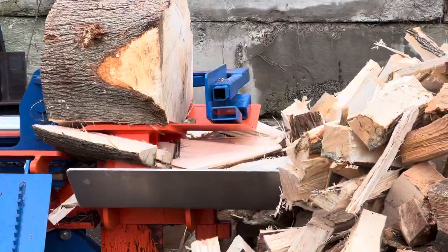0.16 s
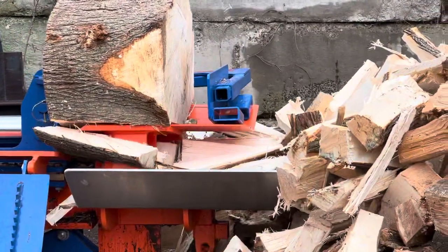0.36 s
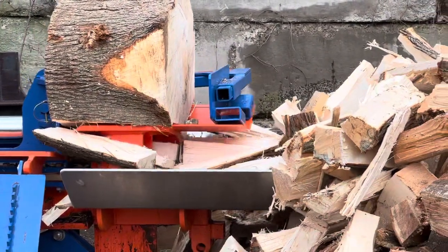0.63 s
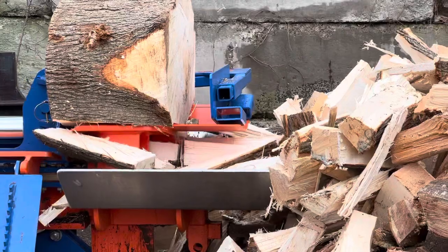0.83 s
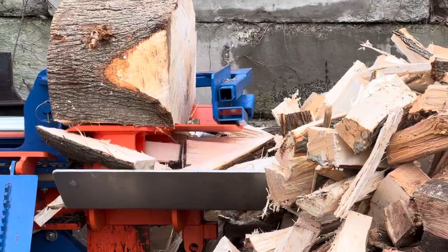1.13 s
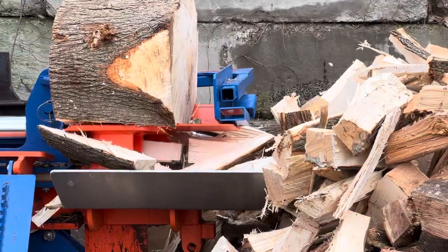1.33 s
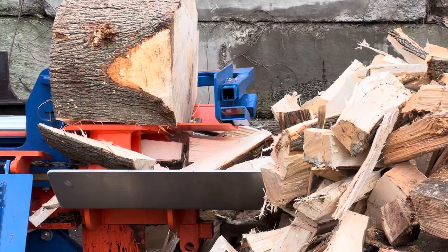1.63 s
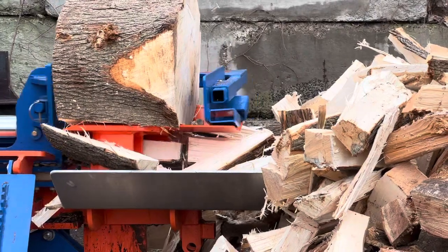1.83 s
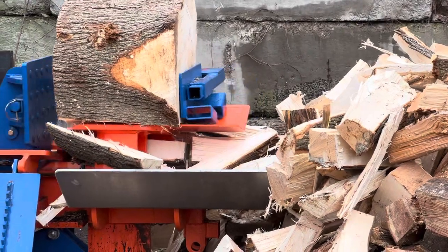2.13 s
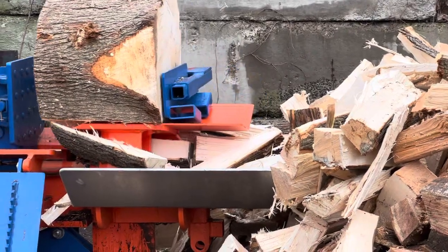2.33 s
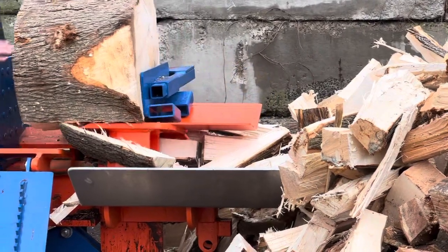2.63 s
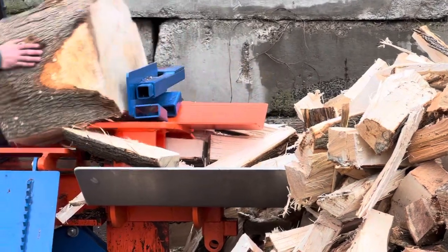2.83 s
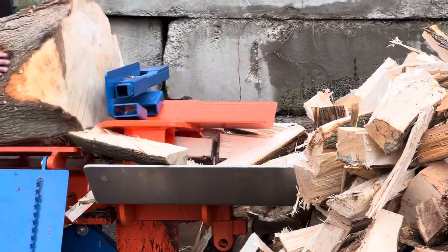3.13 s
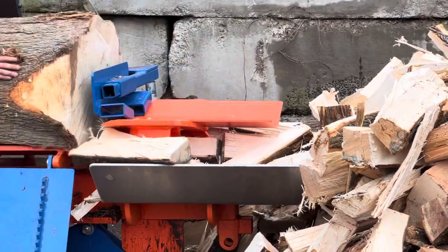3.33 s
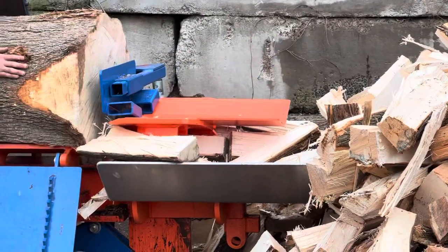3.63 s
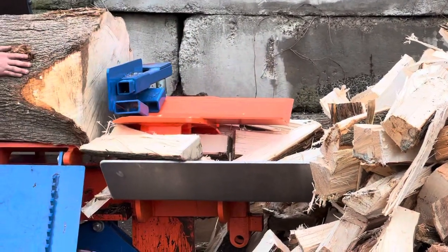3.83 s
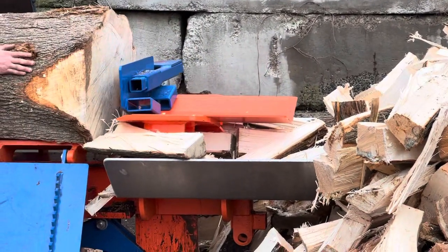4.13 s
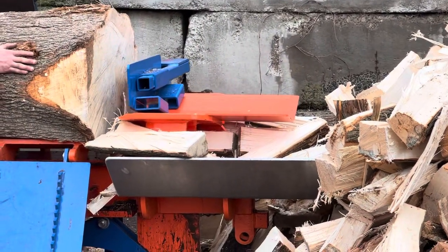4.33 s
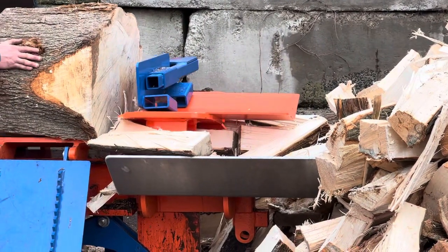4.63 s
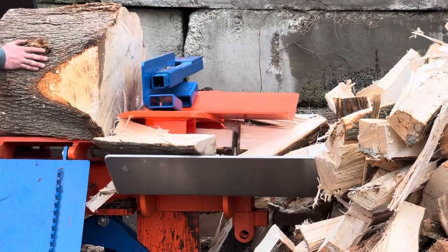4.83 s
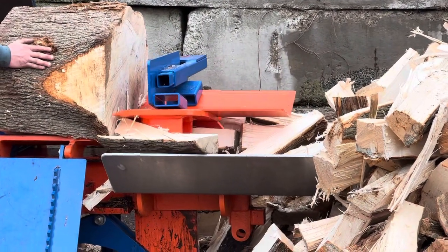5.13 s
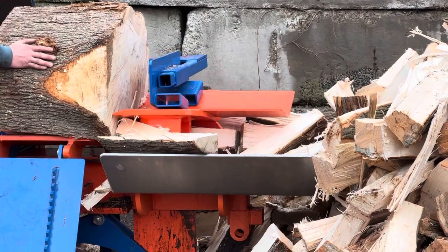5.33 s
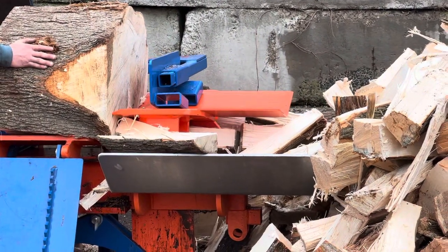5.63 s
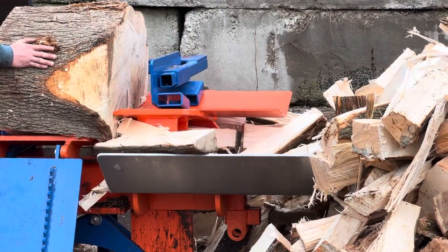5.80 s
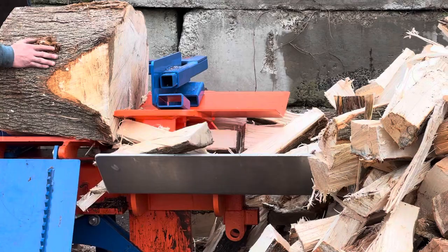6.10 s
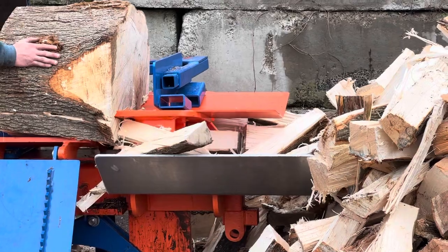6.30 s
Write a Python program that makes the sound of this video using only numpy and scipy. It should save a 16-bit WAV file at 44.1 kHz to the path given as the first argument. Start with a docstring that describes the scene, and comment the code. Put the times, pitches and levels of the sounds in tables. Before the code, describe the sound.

Outdoors beside a wall, a log splitter's engine runs with a steady exhaust drone and valve rattle, its tone shifting with the load. Wood creaks and snaps under pressure, followed by two rattling metal clunks and a few small cracks. Near the end the log groans against the steel, the frame knocks again and the fibres split in a burst of sharp crackles. The machine sits in the middle of a slightly wide stereo image.

```python
"""A yard beside a block wall, where a small four-stroke engine drives a hydraulic log splitter. The engine is
the bed: exhaust drone, clatter and valve rattle change colour with the pump load. Over it, wood grinds and
creaks along the steel, short tonal groans swell up, the ram knocks at the ends of its stroke and the log cracks
on the wedge. A drifting haze of sparse echoes and a pair of microphone ports give the width."""
import sys
import numpy as np
from scipy import signal
from scipy.fft import rfft, irfft, next_fast_len
from scipy.io import wavfile
from scipy.ndimage import uniform_filter1d

SR = 44100
rng = np.random.default_rng(int(sys.argv[2]) if len(sys.argv) > 2 else 0)


def master(y):
    """Save y as 16-bit WAV."""
    cut = np.clip(np.atleast_2d(y).T, -1, 1)
    pcm = np.round(cut * 32767)  # scale
    wavfile.write(sys.argv[1], SR, pcm.astype(np.int16))


N = 284886

# engine moves: (time [s], firing rate [Hz], pump load [-1 lugging, 0 idle, 1 ram returning, 2 pushing])
ENGINE = [(0, 27.61, 1.98), (1.1, 27.44, 1.76), (1.4, 27.62, 1.65), (1.51, 27.63, 1.04),
          (1.68, 28.42, 0.62), (1.76, 27.62, 1.2), (1.98, 27.24, 1.01), (3.38, 27.81, 0.94),
          (3.49, 28.11, 0.84), (3.58, 29, 0.78), (3.69, 29.4, -0.19), (3.78, 28.38, 0.024),
          (5.05, 28.44, 0.0017), (5.14, 27.96, -.2), (5.25, 27.21, -.8), (5.33, 27.22, -1.2),
          (5.47, 28.43, -0.49), (5.63, 27.84, -0.33), (5.72, 27.6, -1), (5.86, 27.65, -0.91),
          (5.97, 28.64, -0.7), (6.17, 28.3, -0.25), (6.46, 28.86, -0.48)]
# engine faders: (pump load, exhaust [dB], clatter [dB], valve gear [dB])
EFFORT = [(-0.95, -22, -28, -38), (-0.021, -26, -31.5, -38), (0.94, -23, -28.5, -37.5),
          (1.87, -23, -26.6, -35.5)]
# tone of exhaust and frame at each of the four loads: (firing order, level [dB])
LUGGING = [(1, -34), (2, -13), (3, -6.5), (4, -15), (5, 1.5), (6, -7.5), (7, -7.5), (8, -5), (9, -19),
           (10, -26), (11, -20), (12, -26), (13, -16), (14, -20), (15, -17), (16, -10), (17, -32),
           (18, -14), (19, -25), (20, -35), (21, -19), (22, -37), (23, -25), (24, -23), (25, -43),
           (26, -34), (27, -41), (28, -31), (29, -19), (30, -35), (31, -34), (32, -45), (33, -48),
           (34, -42), (35, -31), (36, -18)]
IDLING = [(1, -35), (2, -14), (3, -3), (4, -27), (5, 0.5), (6, -16), (7, -30.5), (8, -21), (9, -27),
          (10, -9.5), (11, -9.5), (12, -27), (13, -8), (14, -16), (15, -25), (16, -22.5), (17, -29.5),
          (18, -17.5), (19, -27), (20, -61), (21, -15), (22, -32.5), (23, -31), (24, -27), (25, -51),
          (26, -25.5), (27, -27), (28, -21.5), (29, -16.5), (30, -68), (31, -24.5), (32, -39), (33, -28),
          (34, -21), (35, -25), (36, -23)]
RETURNING = [(1, -53), (2, -17.5), (3, -6.5), (4, -14.5), (5, 0.5), (6, -5), (7, -6.5), (8, -5.5),
             (9, -21.5), (10, -12.5), (11, -14.5), (12, -57), (13, -22), (14, -10.5), (15, -18.5),
             (16, -10.5), (17, -47), (18, -24), (19, -26.5), (20, -38), (21, -23.5), (22, -23.5),
             (23, -14.5), (24, -26), (25, -20.5), (26, -48), (27, -70), (28, -19), (29, -24), (30, -29),
             (31, -72), (32, -21.5), (33, -53), (34, -31), (35, -22), (36, -18)]
PUSHING = [(1, -51), (2, -19), (3, -6.5), (4, -20), (5, 1), (6, -2), (7, -9), (8, -5.5), (9, -12), (10, -7),
           (11, -10.5), (12, -22), (13, -18), (14, -11.5), (15, -12.5), (16, -10.5), (17, -65), (18, -40),
           (19, -13.5), (20, -11.5), (21, -28), (22, -11), (23, -7.5), (24, -19), (25, -18), (26, -34),
           (27, -63), (28, -11.5), (29, -20), (30, -19), (31, -12), (32, -17), (33, -23), (34, -24),
           (35, -14), (36, -18)]
# colour of mechanical clatter and cooling air: (frequency [Hz], gain [dB])
CLATTER_EQ = [(30, -26), (100, -1), (300, 1), (700, -6.5), (1200, -10), (1900, -14.5), (3000, -17),
              (5000, -21), (8400, -20.5), (9600, -22), (10500, -20.5), (11500, -21.5), (12600, -25.5),
              (15500, -30)]
# casing resonances: (frequency [Hz], width [Hz], idle boost [dB], loaded boost [dB])
CASING = [(1320, 44, 5, 11), (1440, 30, 11, -1), (1620, 40, -1, 9.5), (1668, 50, 11, -4),
          (1795, 30, 11.5, -6), (2250, 55, 12, 7.5), (2433, 80, 8, 7), (2725, 130, -1, 7.5),
          (3040, 45, -7, 11), (3440, 37, 11, 9), (3980, 60, 0, 9.5), (4729, 40.3, 11, 3),
          (5040, 150, 10, 10.5), (5437, 40.1, 10, 6)]
# colour of wood dragged on steel: (frequency [Hz], gain [dB])
WOOD_EQ = [(88, -9), (150, -7.5), (345, 0.5), (638, -7.5), (729, -6), (792, -6.5), (1620, -16), (2040, -30),
           (3000, -21.5), (8000, -68), (10400, -64), (17600, -120)]
# fader ride of the grinding: (time [s], level [dB])
GRIND_FADER = [(0, -28.5), (.2, -25.5), (.5, -26.5), (.6, -23.5), (.8, -28), (.97, -30), (1.1, -28),
               (1.25, -26), (1.4, -30), (1.68, -32), (1.9, -33), (3.6, -29), (4.1, -37), (5.05, -32.5),
               (5.35, -32.5), (5.8, -28), (6.46, -29)]
# short groaning tones: (time [s], length [s], pitch [Hz], peak [dB])
GROANS = [(2.89, 0.053, 928, -22), (5.111, 0.086, 281.3, -24.5), (5.231, 0.13, 376, -23.5),
          (5.302, 0.066, 439.5, -32), (5.742, 0.078, 255, -21), (5.839, 0.077, 285, -24.5)]
# single slips of the wood: (time [s], level [dB])
CREAKS = [(0.0682, -10.5), (0.1171, -17), (0.1334, -9), (0.162, -11), (0.2333, -14), (0.2708, -12),
          (0.2958, -14), (0.3215, -13), (0.444, -15.5), (0.496, -13), (0.533, -17), (0.5618, -13.5),
          (0.5896, -15), (0.628, -13), (0.6625, -18), (0.709, -17.5), (0.752, -18), (0.7923, -20),
          (0.832, -17.5), (0.8993, -17.5)]
# creak pitch, climbing as the split tightens: (time [s], pitch [Hz])
CREAK_PITCH = [(0, 1060), (.33, 1070), (.37, 1300), (.68, 1313), (.71, 1620), (1.5, 1580)]
# blows on the frame: (time [s], level [dB], rattle [dB], rattle top end [dB], thump [dB], t60 [s])
KNOCKS = [(1.724, -7.5, -13, 0, -20, 0.097), (1.733, -7, -8.5, -3, -21, 0.11),
          (1.744, -4, -17, -8, -13, 0.14), (1.756, -8, -23, -7, -13, 0.13),
          (1.789, -13.5, -22, -7, -19, 0.22), (2.928, -19, -32, -9, -29, 0.12),
          (3.341, -6.5, -15.5, -11, -28, 0.15), (3.349, -5.5, -15, -12, -25, 0.092),
          (3.364, -10, -26, -14, -23, 0.15), (3.39, -14, -16, -14, -28, 0.12),
          (5.139, -22, -28, -9, -32, 0.075), (5.722, -15, -9.5, -6, -32, 0.12),
          (5.749, -12, -14.5, -4, -26, 0.12)]
# ring of the frame: (frequency [Hz], relative level [dB], t60 [s])
FRAME_MODES = [(172, -22, 0.14), (243, -19, 0.14), (302, 27.5, 0.094), (360, 11, 0.3), (457, -20, .08),
               (630, -5.5, 0.073), (944, -9, 0.072), (1170, 4, 0.074), (1480, 7.5, 0.055)]
# fibres snapping: (time [s], peak [dB], low ring [Hz], high ring [Hz], high over low [dB],
# splinter hiss [dB], t60 [s])
CRACKS = [(0.1327, -17, 1650, 2920, 3, 1.5, .03), (0.7066, -13.5, 1620, 2960, -12, 1, .04),
          (1.0932, -9, 2280, 3170, 9, -1, 0.033), (1.1044, -13.5, 2300, 3550, 8, -4, 0.048),
          (3.6969, -17, 1842, 3480, -10, 8, .08), (3.7194, -22, 2250, 3410, -5, -1.5, 0.069),
          (4.6235, -19, 1654, 3774, -3, 3, 0.03), (4.657, -16.5, 1879, 4494, 5, 9, 0.024),
          (4.671, -16, 2000, 3299, 11, 1.5, .025), (5.7217, -9, 1800, 3730, 2, 4, 0.056),
          (5.7994, -18, 1540, 3700, 10, -2, 0.096), (5.8301, -11.5, 1490, 3020, 2, 2, 0.047),
          (5.8414, -11, 1400, 3443, -8, -1.5, 0.056), (6.0345, -12, 1450, 2806, -6, -2, 0.021),
          (6.0764, -3.5, 1970, 4450, -5, 14, 0.019), (6.1901, -2.5, 1806, 4058, 2, 6, 0.011),
          (6.2261, -6, 1917, 6060, -6, 1.5, .013), (6.2464, -17, 1202, 3096, -4, -2, 0.046),
          (6.4263, -21, 1630, 3370, -1, -3, .055)]
# send to the widening echoes: (frequency [Hz], gain [dB])
WIDTH_EQ = [(40, -27), (130, -19), (300, -19), (600, -12), (1200, -12), (1600, -30), (2600, -36),
            (3400, -17), (5000, -20), (7200, -34), (8400, -10), (9100, -10), (9400, -50), (10800, -50),
            (11100, -9), (12200, -9), (12700, -45), (14300, -45), (15000, -5)]
# tilt between the ports: (frequency [Hz], left over right [dB])
PORT_BALANCE = [(60, 0.5), (92, 1.0), (140, 3.5), (210, 1.5), (330, 1.0), (500, 1.5), (770, 3.0),
                (1170, 2.5), (1790, 0.5), (2740, 0.0), (4190, 0.0), (6410, 0.0), (9810, 0.0), (15000, 0.0)]
# phase between the ports: (frequency [Hz], left lead [half turns])
PORT_LEAD = [(60, 0), (700, .12), (1500, 0), (7500, 0), (8700, -.45), (9250, -1), (10850, -1),
             (11500, -1.45), (12550, -2), (14400, -2), (15500, -3)]

OVERSPEED_HZ, THROTTLE_DB_PER_HZ = 28.2, -3
IDLE_HZ, LOADED_HZ = 28.4, 27.5
TEAR_START_S, TEAR_END_S, SMALL_SNAPS = 5.74, 6.28, 12
THUMP_HZ, HIGH_CUT_HZ = 81, 15600


def amp(db):
    """dB to gain."""
    return 10 ** (np.asarray(db) / 20)


def unit_rms(x):
    """Scales to rms 1."""
    return x / np.sqrt(np.mean(x ** 2) + 1e-20)


def automation(rows):
    """Columns of a time table, one value a sample."""
    times, *columns = np.transpose(rows)
    return [np.interp(np.arange(N) / SR, times, column) for column in columns]


def read_curve(points, hz):
    """Reads a spectrum table on a log-frequency axis."""
    knots, values = np.transpose(points)
    return np.interp(np.log(hz + 1), np.log(knots + 1), values)


def eq(x, points):
    """Filters by a table of (frequency [Hz], gain [dB])."""
    size = next_fast_len(len(x) + 2048)
    gain = amp(read_curve(points, np.fft.rfftfreq(size, 1 / SR)))
    return irfft(rfft(x, size) * gain, size)[:len(x)]


def wander(seconds, count=1):
    """Rows of smooth random modulation, rms 1, that change over the given time."""
    steps = rng.standard_normal((count, N // 128 + 2))
    span = max(round(seconds * SR / 128), 1)
    steps = unit_rms(uniform_filter1d(uniform_filter1d(steps, span, axis=1), span, axis=1))
    return np.array([np.interp(np.arange(N) / 128, np.arange(len(row)), row) for row in steps])


def clicks(per_second, spread_db, cap):
    """Random clicks at rms 1, the biggest up to cap * spread_db above the smallest."""
    sizes = amp(spread_db * np.minimum(rng.exponential(1, N), cap))
    hits = rng.random(N) < per_second / SR
    return unit_rms(sizes * hits * rng.choice([-1, 1], N))


def ring(hz, t60, t):
    """A dying mode."""
    return amp(-60 * t / t60) * np.sin(2 * np.pi * hz * t)


def add(mix, start, sound):
    """Mixes a sound in at start seconds."""
    part = mix[round(start * SR):][:len(sound)]
    part += sound[:len(part)]


def stereo_width(direct):
    """Sparse, quickly dying echoes spread the sound between the channels; the spread drifts between four sets
    of them."""
    taps = np.zeros((4, 2000))
    delays = np.arange(40, 1980, 20) + rng.integers(0, 20, (4, 97))
    gains = rng.choice([-1., 1.], delays.shape) * amp(-60 * delays / SR / 0.01)
    np.put_along_axis(taps, delays, gains, axis=1)
    blend = wander(0.028, count=4)
    send = eq(direct, WIDTH_EQ)
    paths = signal.oaconvolve(send[None], taps / np.linalg.norm(taps[0]), axes=1)[:, :N]
    return (paths * blend).sum(axis=0) / np.linalg.norm(blend, axis=0)


def clatter(cycles):
    """Cooling air and valve ticks swell after each firing and, less, half a cycle later."""
    pulse = 1 + 0.29 * np.exp(-(cycles % 1) / 0.24) + 0.18 * np.exp(-((cycles + .5) % 1) / 0.22)
    ticks = clicks(per_second=1500, spread_db=2.5, cap=5)
    air = rng.standard_normal(N)
    flutter = amp(1.03 * wander(.02)[0])
    return unit_rms(eq(pulse * (air + 0.49 * ticks) * flutter, CLATTER_EQ))


def valve_gear(cycles, load):
    """Valves and pump gears loop one rattle a cycle; load crossfades the idle and loaded loops."""
    order = np.arange(1025)
    phase, uneven = rng.random((2, len(order))), rng.standard_normal((2, len(order)))
    hz = np.outer([IDLE_HZ, LOADED_HZ], order)
    casing_db = sum(np.array(boosts)[:, None] / (1 + (2 * (hz - centre) / width) ** 4)
                    for centre, width, *boosts in CASING)
    muted = (order <= len(IDLING)) | (order > 300)  # the low orders are left to the exhaust
    order_db = read_curve(CLATTER_EQ, hz) + casing_db + 2.4 * uneven - 60 * muted
    loops = irfft(np.exp(2j * np.pi * phase) * amp(order_db), axis=1)
    playhead = (cycles + 0.00037 * wander(0.079)[0]) % 1
    grid = np.arange(loops.shape[1]) / loops.shape[1]
    idle, loaded = [np.interp(playhead, grid, unit_rms(loop)) for loop in loops]
    crossfade = np.clip(abs(load), 0, 1) * np.pi / 2
    return np.cos(crossfade) * idle + np.sin(crossfade) * loaded


def exhaust(cycles, load):
    """A drone of firing orders; the load morphs their levels and each wavers, the high ones most."""
    out, waver = np.zeros(N), wander(0.053, count=len(IDLING))
    for k, rows in enumerate(zip(LUGGING, IDLING, RETURNING, PUSHING)):
        order, levels = rows[0][0], [row[1] for row in rows]
        db = np.interp(load, range(-1, 3), levels) + 0.079 * order * waver[k]
        # pipe and silencer delay each order differently, smearing the pulse over the whole cycle
        phase = -.75 * order ** 2 - .6 * (order % 2) - 1.1
        out += amp(db) * np.cos(2 * np.pi * order * cycles + phase + 0.032 * order * waver[k - 1])
    return np.sqrt(2) * out


def engine(firing_hz, cycles, load):
    """The load rides three layers; the governor throttles the exhaust back when the engine races."""
    loads, *faders = np.transpose(EFFORT)
    exhaust_db, clatter_db, gear_db = [np.interp(load, loads, fader) for fader in faders]
    throttle_db = THROTTLE_DB_PER_HZ * np.maximum(firing_hz - OVERSPEED_HZ, 0)
    return (amp(exhaust_db + throttle_db) * exhaust(cycles, load)
            + amp(gear_db) * valve_gear(cycles, load)
            + amp(clatter_db) * clatter(cycles))


def grind(cycles, load):
    """Stick-slip grains, shaken loose by each firing; they sing at the creak pitch as the ram pushes."""
    density = amp(1.5 * wander(.01)[0]) * (1 + .5 * np.cos(2 * np.pi * cycles))
    rub = clicks(per_second=2500 * density, spread_db=2, cap=3) + 0.76 * rng.standard_normal(N)
    carrier = np.exp(2j * np.pi * np.cumsum(automation(CREAK_PITCH)[0]) / SR)
    pole = np.exp(-np.pi * 90 / SR)  # a gliding resonance 90 Hz wide
    resonance = (carrier * signal.lfilter([1 - pole], [1, -pole], rub / carrier)).real
    sing = unit_rms(resonance * np.clip(load - 1, 0, 1))
    return amp(automation(GRIND_FADER)[0]) * (unit_rms(eq(rub, WOOD_EQ)) + amp(-17.5) * sing)


def groans():
    """Short swells of one slightly unsteady pitch."""
    out, wobble = np.zeros(N), wander(0.0076)[0]
    for start, length, hz, db in GROANS:
        size = round(length * SR)
        pitch = hz * (1 + 0.034 * wobble[round(start * SR):][:size])
        add(out, start, amp(db) * np.hanning(size) * np.sin(2 * np.pi * np.cumsum(pitch) / SR))
    return out


def creaks():
    """Each slip is a few ms of rubbing that rings the split and taps the body of the log."""
    out, t = np.zeros(N), np.arange(SR // 10) / SR
    rubs = rng.standard_normal((len(CREAKS), 300)) * np.exp(-np.arange(300) / 60)
    for (start, db), rub in zip(CREAKS, rubs):
        hz = np.interp(start, *np.transpose(CREAK_PITCH))
        split = np.convolve(rub, ring(hz, 0.026, t) + .5 * ring(0.678 * hz, 0.057, t))
        body = eq(np.pad(rub, (0, len(t) - 1)), WOOD_EQ)
        add(out, start, amp(db) * (split / abs(split).max() + 1.34 * body / abs(body).max()))
    return out


def knocks():
    """Each blow of ram and log rings the frame, thumps the steel bed and throws a burst of rattle."""
    out, t = np.zeros(N), np.arange(SR // 3) / SR
    for start, db, rattle_db, top_db, thump_db, t60 in KNOCKS:
        rattle_noise, body_noise = rng.standard_normal((2, len(t)))
        frame = sum(amp(mode_db + 8.2 * chance) * ring(hz, mode_t60, t)
                    for (hz, mode_db, mode_t60), chance in zip(FRAME_MODES, body_noise))
        body = unit_rms(eq(body_noise, [(30, -55), (60, -7), (350, 2), (1200, -5), (3000, -39)]))
        rattle_eq = [(500, -20), (1200, 4.5), (2800, 1.5), (4800, top_db), (15000, top_db - 21)]
        rattle = amp(rattle_db) * unit_rms(eq(rattle_noise, rattle_eq))
        envelope = amp(-60 * t / t60) * (1 - np.exp(-t / 0.0034))
        linger = (1 - np.exp(-t / 0.0041)) * amp(25 * t / t60)  # loose parts rattle later and longer
        blow = 0.66 * frame / abs(frame).max() + envelope * (0.53 * body + linger * rattle)
        add(out, start, amp(db) * blow + amp(thump_db) * ring(THUMP_HZ, 0.041, t))
    return out


def tearing_snaps():
    """The log tears: small random snaps between the loud ones, as rows like those of CRACKS."""
    slots = (np.arange(SMALL_SNAPS) + rng.random(SMALL_SNAPS)) / SMALL_SNAPS
    starts = TEAR_START_S + (TEAR_END_S - TEAR_START_S) * slots
    return [(start, -19.5 + 0.5 * size, 1750 * (1 + 0.2 * low), 3400 * (1 + 0.18 * high), -3, 3, .035)
            for start, (size, low, high) in zip(starts, rng.standard_normal((SMALL_SNAPS, 3)))]


def cracks():
    """Fibres snap on the wedge: a noise burst with two broad rings, splinter hiss and a rustling tail."""
    out, t = np.zeros(N), np.arange(SR // 8) / SR
    for start, db, low_hz, high_hz, high_db, hiss_db, t60 in CRACKS + tearing_snaps():
        noise = rng.standard_normal(len(t))
        attack = 1 - np.exp(-t / (0.018 * t60))  # longer crunches also start more softly
        burst = noise * attack * amp(-60 * t / t60)
        rustle = noise * amp(-18.5 - 60 * t / 0.26)
        rings = ring(low_hz, 0.004, t[:800]) + amp(high_db) * ring(high_hz, 0.004, t[:800])
        hiss = eq(burst + rustle, [(120, -30), (500, 5.5), (1500, 6), (5000, 5), (15000, -10)])
        snap = unit_rms(np.convolve(burst, rings)[:len(t)]) + amp(hiss_db) * unit_rms(hiss)
        add(out, start, amp(db) * snap / abs(snap).max())
    return out


def scene():
    """Engine and wood sit in the centre; the widening echoes reach the two ports in opposite polarity."""
    firing_hz, load = automation(ENGINE)
    cycles = np.cumsum(firing_hz) / SR
    bed = engine(firing_hz, cycles, load) + grind(cycles, load)
    direct = bed + knocks() + creaks() + cracks() + groans()
    return direct + np.array([[1], [-1]]) * stereo_width(direct)


def record(dry):
    """The microphone ports tilt the balance and turn the phase between channels; then a high cut."""
    size = next_fast_len(N + 4096)
    hz, side = np.fft.rfftfreq(size, 1 / SR), np.array([[.5], [-.5]])
    balance = amp(side * read_curve(PORT_BALANCE, hz))
    phase_turn = np.exp(1j * np.pi * side * read_curve(PORT_LEAD, hz))
    heard = irfft(rfft(dry, size, axis=1) * balance * phase_turn, size, axis=1)[:, :N]
    high_cut = signal.firwin(511, HIGH_CUT_HZ, window=("kaiser", 9), fs=SR)
    return signal.oaconvolve(heard, high_cut[None], "same")


dry = scene()
out = record(dry)
master(out)
```